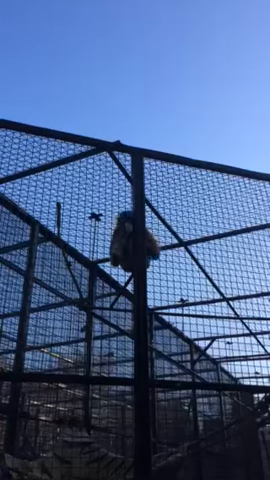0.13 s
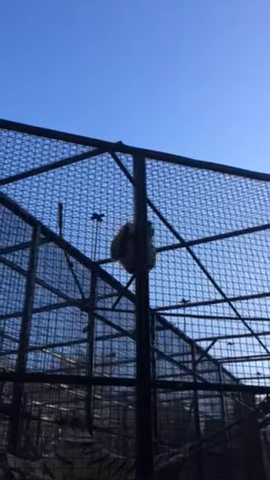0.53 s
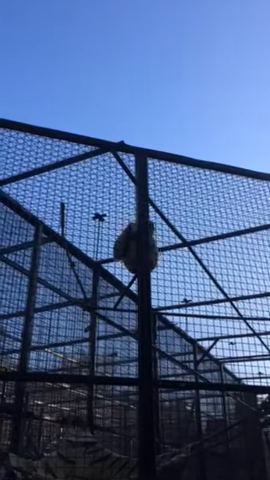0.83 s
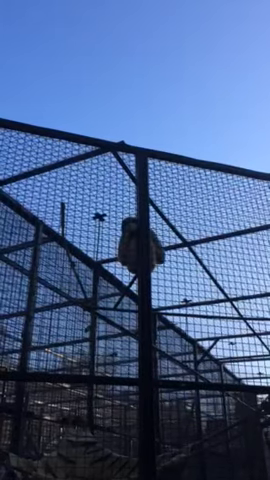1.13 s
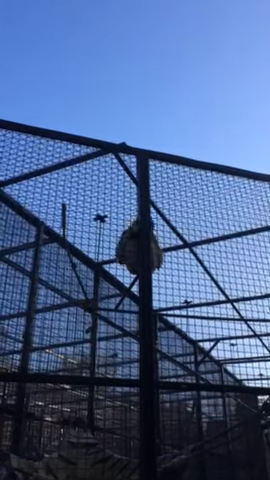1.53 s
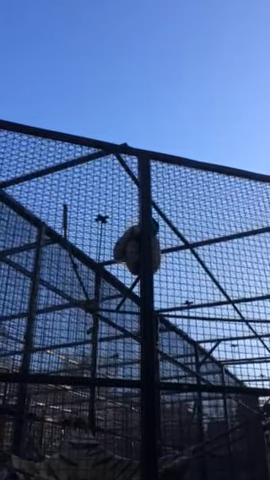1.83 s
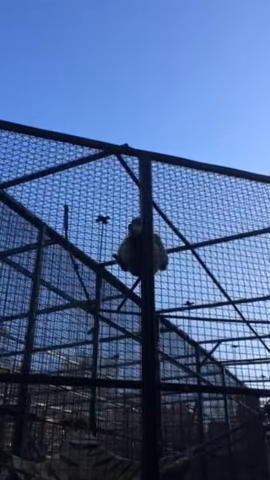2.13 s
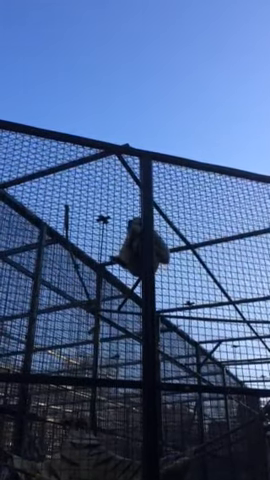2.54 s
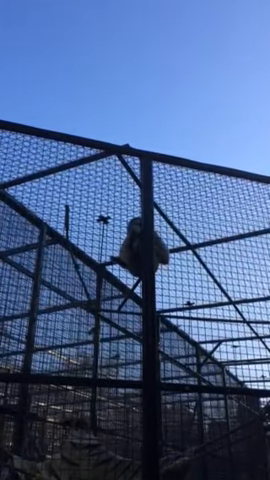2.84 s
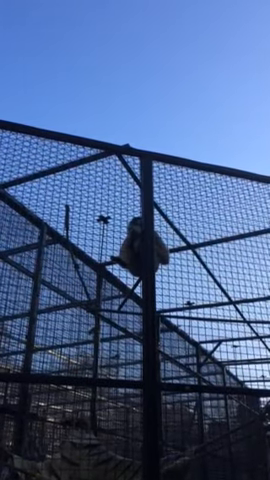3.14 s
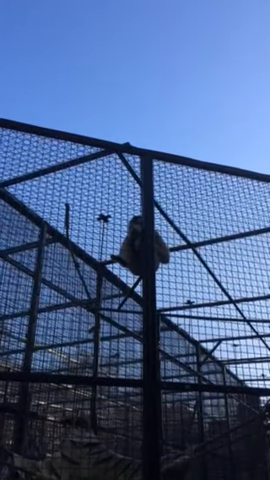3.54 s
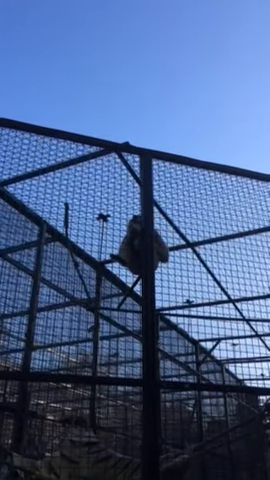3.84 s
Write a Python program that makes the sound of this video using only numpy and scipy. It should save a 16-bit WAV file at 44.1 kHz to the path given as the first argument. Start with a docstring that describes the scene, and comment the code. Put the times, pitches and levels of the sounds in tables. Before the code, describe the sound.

After faint chirps and a light tick, a single ape hoots briefly and whoops five times, each sweeping upward and echoing around the enclosure, over quiet outdoor noise; a handheld microphone picks up soft bumps.

```python
"""A gibbon gives a short hoot, then five loud rising whoops, outdoors on top of a cage.
Its voice is nearly a pure tone whose overtones grow as the mouth opens with rising pitch.
One ground bounce colours the calls and the enclosure rings on as filtered, decaying noise.
Sine chirps of small birds, noise ticks and bumps, outdoor noise and a low drone lie behind.
An automatic gain control pushes everything down on loud calls and recovers after each."""
import sys
import numpy as np
from scipy import signal
from scipy.fft import rfft, irfft
from scipy.io import wavfile
from scipy.ndimage import uniform_filter1d, minimum_filter1d

SR = 44100
rng = np.random.default_rng(int(sys.argv[2]) if len(sys.argv) > 2 else 0)


def store_pcm(level_fs):
    """Save levels as 16-bit WAV."""
    pcm = np.round(np.clip(level_fs, -1, 1) * 32767).astype(np.int16)
    wavfile.write(sys.argv[1], SR, np.atleast_2d(pcm).T)


N = 176400


def undb(db):
    """Decibels to amplitude gain."""
    return 10 ** (np.asarray(db) / 20)


def on_log(hz, points, values):
    """Read a curve on a log-frequency axis."""
    return np.interp(np.log(np.maximum(hz, 1)), np.log(points), values)


def unit(x):
    """Scale to rms 1."""
    return x / np.sqrt(np.mean(x ** 2))


def noise(colour):
    """Noise of rms 1, its spectrum shaped by (Hz, relative dB) points."""
    points_hz, points_db = np.array(colour, float).T
    gain = undb(on_log(np.fft.rfftfreq(N, 1 / SR), points_hz, points_db))
    return unit(irfft(rfft(rng.standard_normal(N)) * gain, N))


def walk(rate):
    """Smooth random wander of rms 1, with `rate` random steps per second."""
    k = max(int(SR / rate), 1)
    steps = np.repeat(rng.standard_normal(N // k + 1), k)
    smooth = uniform_filter1d(uniform_filter1d(steps, k), k)
    return unit(smooth[:N])


def ramp(u):
    """Smooth step from 0 to 1."""
    return np.sin(np.pi / 2 * np.clip(u, 0, 1)) ** 2


def swell(t, start, length):
    """One rounded rise and fall."""
    return np.sin(np.pi * np.clip((t - start) / length, 0, 1))


def outdoors(t):
    """Gently wavering outdoor noise over a distant traffic drone: noise through a narrow resonance."""
    # outdoor noise spectrum: pitch_hz [Hz], density_db [relative dB per Hz]
    air_colour = [(20, -20), (40, -10.5), (80, -0.5), (160, -2), (300, -12.5), (450, -12), (800, -14.5),
                  (1800, -20), (2600, -20.5), (3400, -22.5), (5000, -26.5), (7000, -29), (10000, -32),
                  (15000, -30)]
    # drone level over time: time_s [s], level_db [dB]
    drone_level = [(.3, -51.5), (.7, -61.5), (1.4, -44), (2.0, -46.5), (2.6, -53.5), (3.2, -46.5),
                   (4, -58.5)]
    air_db, waver_db, waver_rate = -49, -2, 12  # waver rate in steps per second
    drone_hz, drone_width_hz = 94.4, 9.7

    peak = signal.iirpeak(drone_hz, drone_hz / drone_width_hz, fs=SR)
    drone = unit(signal.lfilter(*peak, rng.standard_normal(N)))
    air = undb(air_db + waver_db * walk(waver_rate)) * noise(air_colour)
    return air + undb(np.interp(t, *np.array(drone_level).T)) * drone


def birds(t):
    """Faint, thin chirps, mostly falling: gliding sines with a slight random waver in pitch."""
    # bird chirps: start_s [s], length_s [s], start_hz [Hz], end_hz [Hz], level_db [dB]
    chirps = [(0.39, 0.052, 7400, 6640, -58), (.55, .07, 6900, 6750, -62), (0.54, 0.074, 6200, 6060, -59.5),
              (1.054, 0.061, 5075, 5170, -65), (1.527, 0.1, 5200, 4880, -58)]
    waver = 1 + 0.0036 * walk(150)
    out = np.zeros(N)
    for start, length, from_hz, to_hz, db in chirps:
        hz = np.interp(t, [start, start + length], [from_hz, to_hz]) * waver
        phase = 2 * np.pi * np.cumsum(hz) / SR
        out += undb(db) * swell(t, start, length) * np.sin(phase)
    return out


def knocks(t):
    """Light ticks are sudden noise bursts that decay exponentially; soft low bumps are swells of noise."""
    # light ticks: start_s [s], level_db [dB]
    ticks = [(.524, -42.5), (0.67, -50)]
    # tick spectrum: pitch_hz [Hz], density_db [relative dB]
    tick_colour = [(300, 1), (1100, -15), (1500, 11), (2000, -3), (6500, -10), (9000, -12), (15000, -13)]
    # soft low bumps: start_s [s], length_s [s], level_db [dB]
    bumps = [(2.367, 0.13, -43), (2.938, 0.28, -50.5), (3.616, 0.098, -33.5)]
    # bump spectrum: pitch_hz [Hz], density_db [relative dB]
    bump_colour = [(40, -9.5), (100, 2), (200, 0.5), (350, -1.5), (700, -18), (3000, -62)]
    tick_decay_s = 0.012

    tick_level = sum(undb(db) * (t >= start) * np.exp(-np.abs(t - start) / tick_decay_s)
                     for start, db in ticks)
    bump_level = sum(undb(db) * swell(t, start, length) for start, length, db in bumps)
    return tick_level * noise(tick_colour) + bump_level * noise(bump_colour)


def enclosure(x, t):
    """Scatter from the nearest bars and walls plus a ringing tail, with its own decay in each band."""
    # ring of the enclosure: centre_hz [Hz], level_db [relative dB], t60_s [s to fall 60 dB]
    ring_bands = [(620, -22.5, 0.64), (830, -22, 1.24), (1040, -18.5, 1.24), (1720, -16, .8),
                  (2230, -13.5, 0.35), (3500, -18.5, 0.59), (8000, -30, .25)]
    early_db, early_t60_s, first_echo_s = 6.5, 0.38, 0.022  # early level is relative to the tail

    age = np.maximum(t[:SR] - first_echo_s, 0)  # the response lasts one second
    scatter, hz = rfft(rng.standard_normal(SR)), np.fft.rfftfreq(SR, 1 / SR)
    centres_hz = [row[0] for row in ring_bands]
    early = undb(early_db) * np.exp(-np.log(1000) * age / early_t60_s)
    response = 0
    # each share picks one band, crossfading into its neighbours
    for share, (_, db, t60) in zip(np.eye(len(ring_bands)), ring_bands):
        band = irfft(scatter * on_log(hz, centres_hz, share), SR)
        tail = np.exp(-np.log(1000) * age / t60)
        decay = (age > 0) * (tail + early)
        response = response + undb(db) * band * decay / np.sqrt(np.sum(decay ** 2))
    return signal.fftconvolve(x, response)[:N]


def ground(x):
    """One delayed bounce off the ground: the level ripples as the pitch sweeps through its notches."""
    delay_s, bounce_db, low_cut_hz = .0087, -6, 1000
    low_cut = signal.butter(1, low_cut_hz, "high", fs=SR, output="sos")
    bounce = signal.sosfiltfilt(low_cut, x)
    samples = np.arange(N)
    return undb(bounce_db) * np.interp(samples - delay_s * SR, samples, bounce, left=0)


def fundamental_gain(hz):
    """The voice weakens at the top of its range."""
    # strength of the fundamental: pitch_hz [Hz], gain_db [dB]
    fundamental = [(570, 0), (680, 0), (800, 0.5), (930, 0.5), (1020, -4.5), (1100, -4.5), (1170, -16.5)]
    return undb(on_log(hz, *np.array(fundamental).T))


def throat_db(hz, mouth, tuning):
    """Throat resonances shape the overtones, blending from a narrow mouth (0) to an open one (1)."""
    # throat resonances: pitch_hz [Hz], narrow_db [dB, mouth narrow], open_db [dB, mouth open]
    throat = [(1093, -35, -17), (1294, -32.5, -19), (1600, -27, -15.5), (1763, -25, -21.5),
              (2160, -51.5, -25.5), (2550, -48, -36.5), (2987, -52.5, -33.5), (3220, -32, -27),
              (3606, -41, -39), (3890, -49.5, -37), (4120, -52.5, -42.5), (4470, -40, -48),
              (5400, -48.5, -43.5), (6700, -56, -47.5), (7900, -61, -50), (9300, -65, -58.5),
              (15000, -74, -66.5)]
    throat_hz, narrow_db, open_db = np.array(throat, float).T
    narrow = on_log(hz, tuning * throat_hz, narrow_db)
    wide = on_log(hz, tuning * throat_hz, open_db)
    return (1 - mouth) * narrow + mouth * wide


def gibbon(t):
    """Each call is a rising tone with weak overtones and a rush of air that pulses with the vocal folds."""
    # pitch curve of each call: time_s [s], pitch_hz [Hz]
    pitch_curves = [
        [(0.79, 610), (0.804, 565), (0.82, 602.6), (0.848, 680), (0.86, 719)],
        [(1.16, 586), (1.174, 588), (1.218, 650), (1.25, 695), (1.292, 704), (1.35, 866), (1.384, 930),
         (1.41, 1037), (1.425, 1011)],
        [(1.832, 582.4), (1.848, 573.5), (1.886, 662.6), (1.962, 718), (2.042, 783.7), (2.074, 884), (2.1, 987),
         (2.115, 985.4)],
        [(2.392, 577.3), (2.48, 704.7), (2.562, 840), (2.604, 931), (2.644, 1114), (2.66, 1105)],
        [(3.018, 568), (3.03, 593), (3.092, 691.8), (3.164, 796), (3.196, 891.6), (3.238, 904.8), (3.264, 1047),
         (3.276, 1085), (3.29, 1093)],
        [(3.638, 586.4), (3.69, 683.0), (3.714, 725), (3.78, 829.4), (3.806, 940), (3.83, 1061), (3.854, 1137),
         (3.88, 1158), (3.9, 1143)],
    ]
    # calls: start_s [s], end_s [s], level_db [dB before pitch weighting],
    # brightness_db [dB, overtones and air], release_s [s], tuning [ratio of throat resonances]
    calls = [(0.778, 0.87, -6.5, -5.5, 0.051, 1.08), (1.151, 1.439, 3, -1.5, 0.031, 1.08),
             (1.818, 2.127, 3, -2.5, .025, 1.028), (2.383, 2.678, 5, 0, 0.042, 0.97),
             (3.007, 3.31, 5, 0.5, 0.042, 0.996), (3.625, 3.918, 5.5, 1.5, 0.05, 1.002)]
    # air rushing through the throat: pitch_hz [Hz], density_db [relative dB per Hz]
    rush_colour = [(300, -5.5), (700, 13), (1700, -2.5), (2400, -5.5), (3300, -10.5), (4200, -15),
                   (5500, -5.5), (7500, -3), (9500, -16.5), (12000, -14), (13600, -7.5), (16000, -20.5)]
    rush_db = -46  # relative to the call, before brightness
    jitter_depth, jitter_rate = .0022, 400  # pitch ratio, steps per second
    shimmer_db, shimmer_rate, flicker_db, flicker_rate = 3, 60, 1.5, 120  # dB, steps per second
    mouth_narrow_hz, mouth_open_hz = 637, 870
    attack_s, overtone_attack_s = 0.055, 0.057  # overtones get both, so they build up later
    fade_s, fade_db_per_overtone = .05, .5

    coo = undb(-36) * swell(t, .752, .055) * np.sin(2 * np.pi * 655 * t)
    out = coo  # a soft coo leads into the hoot
    jitter = 1 + jitter_depth * walk(jitter_rate)
    rush = noise(rush_colour) * undb(flicker_db * walk(flicker_rate))
    # each overtone flickers on its own
    shimmer = {k: shimmer_db * walk(shimmer_rate) for k in range(2, 19)}

    for curve, (start, end, db, brightness_db, release, tuning) in zip(pitch_curves, calls):
        i = (t >= start) & (t < end)
        since_start, to_end = t[i] - start, end - t[i]
        hz = uniform_filter1d(np.interp(t[i], *np.array(curve).T), size=500) * jitter[i]
        phase = 2 * np.pi * np.cumsum(hz) / SR
        effort = ramp(since_start / attack_s) * ramp(to_end / release)
        mouth = ramp((hz - mouth_narrow_hz) / (mouth_open_hz - mouth_narrow_hz))
        tone = fundamental_gain(hz) * np.sin(phase)

        # the highest overtones fade most at the end
        fade_db = fade_db_per_overtone * (1 - ramp(to_end / fade_s))
        overtones = 0
        for k in shimmer:
            gain_db = throat_db(k * hz, mouth, tuning) + shimmer[k][i] - (k - 1.5) * fade_db
            overtones = overtones + undb(gain_db) * np.sin(k * phase)

        pulse = 1 + .5 * np.sin(phase)
        air = undb(rush_db) * fundamental_gain(hz) * rush[i] * pulse
        brightness = undb(brightness_db) * ramp(since_start / overtone_attack_s)
        out[i] += undb(db) * effort * (tone + brightness * (overtones + air))
    return np.sqrt(2) * out  # a sine at 0 dB has rms 1


def scene():
    """The gibbon, its reflections and the surroundings."""
    t = np.arange(N) / SR
    voice = gibbon(t)
    reflections = ground(voice) + enclosure(voice, t)
    surroundings = birds(t) + knocks(t) + outdoors(t)
    return (voice + reflections + surroundings)[None]


def record(dry):
    """Gain drops for loud sounds, holds and recovers; the start is silent and the top treble is cut."""
    threshold_db, max_cut_db = -9.5, 11.5
    ahead_s, attack_s, hold_s, recover_s = .016, .024, .24, .13
    silent_s, top_hz = .08, 15400

    power = uniform_filter1d(dry[0] ** 2, size=441)  # 10 ms average
    level_db = 10 * np.log10(np.maximum(power, 1e-12))
    duck_db = -np.clip(level_db - threshold_db, 0, max_cut_db)
    # keep the deepest cut through the hold, starting slightly ahead of the sound
    span, recover = int((hold_s + ahead_s) * SR), int(recover_s * SR)
    held_db = minimum_filter1d(duck_db, span, origin=(span - 1) // 2 - int(ahead_s * SR))
    falling_db = uniform_filter1d(held_db, int(attack_s * SR))
    recovering_db = uniform_filter1d(held_db, recover, origin=(recover - 1) // 2)
    gain = undb(np.minimum(falling_db, recovering_db)) * (np.arange(N) > silent_s * SR)
    top_cut = signal.ellip(12, .1, 80, top_hz, fs=SR, output="sos")
    return signal.sosfilt(top_cut, dry * gain)


dry = scene()
out = record(dry)
store_pcm(out)
```